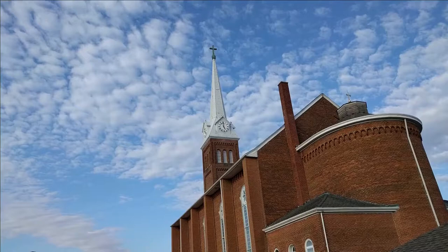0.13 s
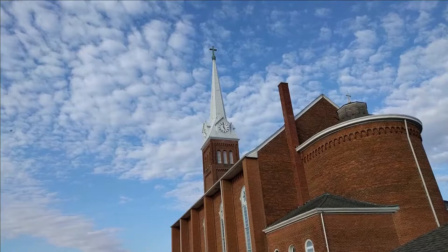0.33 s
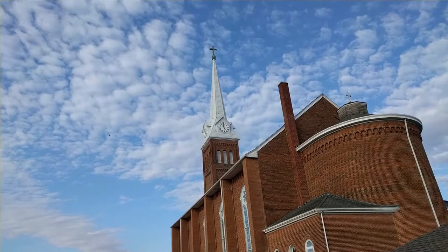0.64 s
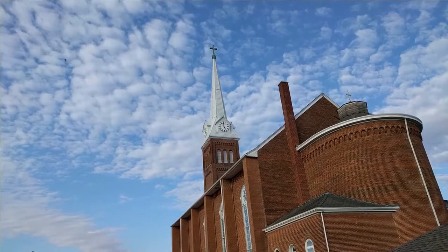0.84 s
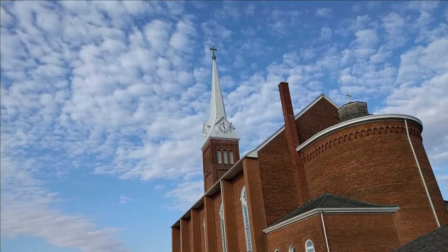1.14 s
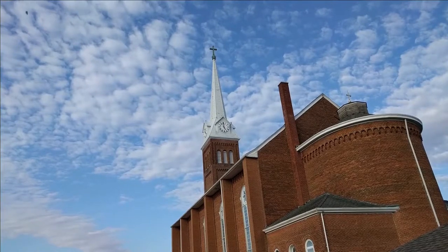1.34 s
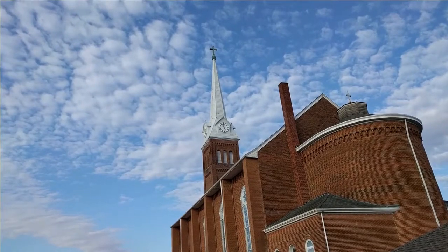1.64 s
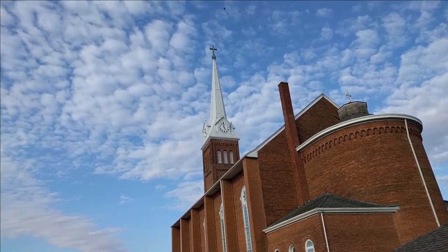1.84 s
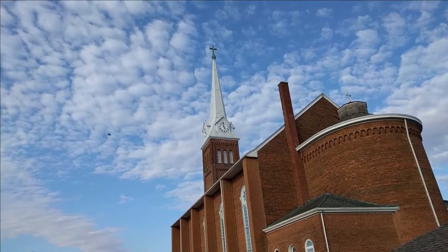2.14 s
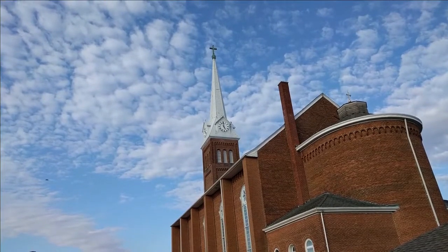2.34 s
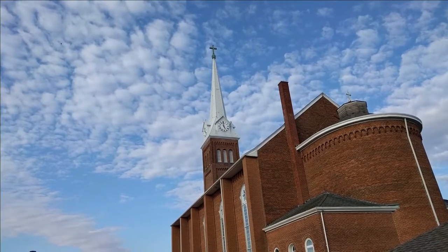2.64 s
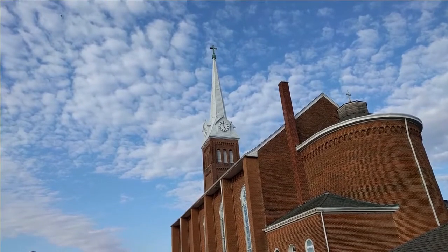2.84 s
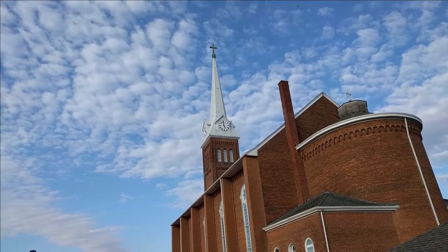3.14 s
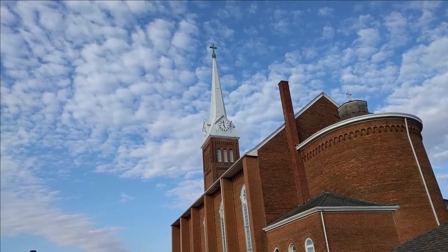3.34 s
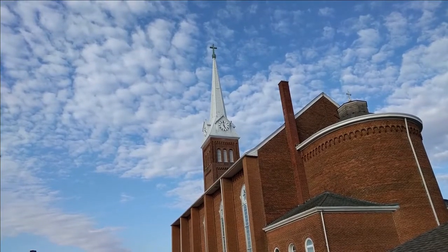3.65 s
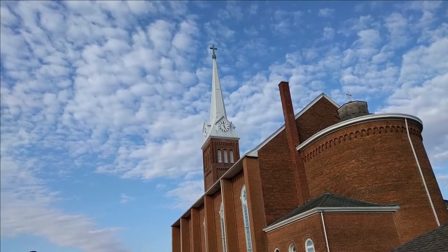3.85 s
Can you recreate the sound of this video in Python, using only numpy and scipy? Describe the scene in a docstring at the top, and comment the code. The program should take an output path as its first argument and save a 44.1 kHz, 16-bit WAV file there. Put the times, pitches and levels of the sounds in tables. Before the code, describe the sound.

One deep metallic church bell stroke, clanging then slowly wavering, still sounding at the end. It follows a quiet outdoor stretch with distant traffic wash, light hiss, small bird notes and a few dry ticks close by.

```python
"""After a moment of silence, a low town rumble opens with a distant wash, hiss and a thin whine: coloured noises
and one wavering tone. Over it a small bird gives gliding sine chips and a falling whistle, echoed by buildings,
amid three tiny ticks near the microphone, each a few fast-dying modes.
Then a church bell is struck once in its tower and rings on, heard from the street below: its partials beat
slowly in close pairs over a crowd of weak modes, while the clapper's noisy clang dies away in the belfry."""
import sys
import numpy as np
from scipy import signal
from scipy.fft import rfft, irfft
from scipy.io import wavfile

SR = 44100
rng = np.random.default_rng(int(sys.argv[2]) if len(sys.argv) > 2 else 0)


def digitize_waveform(pressure):
    """Quantize a signal to 16-bit integers and store it at the path in sys.argv[1].

    Rows of a 2-D input are taken as channels; values are limited to [-1, 1].
    """
    field = np.atleast_2d(pressure).T
    bounded = np.clip(field, -1, 1)
    quanta = np.round(bounded * 32767).astype(np.int16)
    wavfile.write(sys.argv[1], SR, quanta)


N = 176400
T = np.arange(N) / SR  # s
HZ = np.fft.rfftfreq(N, 1 / SR)


def amp(db):
    """Decibels to gain."""
    return 10 ** (np.asarray(db) / 20)


def unit(x):
    """Scales to rms 1."""
    return x / np.sqrt(np.mean(abs(x) ** 2) + 1e-30)


def over_hz(points, hz):
    """Reads a table on a log-frequency axis."""
    f, value = np.transpose(points)
    return np.interp(np.log(hz + 1), np.log(f), value)


def level(points):
    """Gain curve from rows of time and dB."""
    return amp(np.interp(T, *np.transpose(points)))


def noise(spectrum):
    """Steady noise of the given colour, rms 1."""
    white = rfft(rng.standard_normal(N))
    return unit(irfft(white * amp(over_hz(spectrum, HZ)), N))


def drift(t, rate_hz, count=1024):
    """Slow complex random motion: random phases under a spectrum that falls off above rate_hz."""
    f = np.fft.fftfreq(count, N / SR / count)
    phases = np.exp(2j * np.pi * rng.random(count))
    motion = np.fft.ifft(phases * (abs(f) > 1) / (1 + (f / rate_hz) ** 2))
    return np.interp(t, np.arange(count) * N / SR / count, unit(motion))


def glide(hz):
    """Sine of rms 1 whose phase sums the moving pitch."""
    return np.sqrt(2) * np.sin(2 * np.pi * np.cumsum(hz) / SR)


def add(mix, s, sound):
    """Mixes a sound in at time s."""
    part = mix[round(s * SR):][:len(sound)]
    part += sound[:len(part)]


def echo(x, t60):
    """Diffuse reflections from the buildings: a decaying noise tail of unit energy."""
    tail = rng.standard_normal(SR) * amp(-60 * T[:SR] / t60)
    return signal.fftconvolve(x, tail / np.linalg.norm(tail))[:N]


def rumble():
    """Low town rumble: bass-heavy noise with a slowly moving level."""
    # colour: f/Hz, relative density/dB
    colour = [(15, -40), (34, -24), (49, 1.5), (62, 0.5), (80, -5.5), (105, -6.5), (150, -16.5), (200, -16),
              (280, -25.5), (600, -47.5)]
    # fader: t/s, level/dB
    fader = [(.15, -55), (.5, -56.5), (.9, -54), (1.6, -54.5), (2.3, -54), (2.7, -51), (3.2, -53.5),
             (4, -54.5)]
    return noise(colour) * level(fader)


def wash():
    """Distant wash of air and traffic: noise fullest in the low mids."""
    # colour: f/Hz, relative density/dB
    colour = [(60, -17), (250, -0.5), (550, -0.5), (800, -3.5), (1150, -4.5), (1600, -9), (2500, -13),
              (4000, -17), (8000, -41)]
    # fader: t/s, level/dB
    fader = [(.15, -68.5), (1.2, -67.5), (2.3, -68), (2.7, -63.5), (4, -64)]
    return noise(colour) * level(fader)


def hiss():
    """Microphone hiss: treble noise with a moving level."""
    # colour: f/Hz, relative density/dB
    colour = [(500, -7), (3000, -6), (5500, -3.5), (6500, -3), (7300, 2.5), (8300, -4), (9200, -6.5),
              (10000, -4.5), (11500, -8), (13500, -5.5), (15800, -8.5)]
    # fader: t/s, level/dB
    fader = [(.15, -73), (.8, -71.5), (2.35, -71), (2.55, -66.5), (4, -68)]
    return noise(colour) * level(fader)


def whine(hz=7500, db=-82.5):
    """Thin high tone whose strength and phase wander at random."""
    return amp(db) * (drift(T, rate_hz=14) * np.exp(2j * np.pi * hz * T)).real


def background():
    """The continuous bed under the events."""
    return whine() + rumble() + wash() + hiss()


def ticks(size=400, top_hz=11100):
    """Tiny dry clicks close to the microphone: small modes that die within milliseconds."""
    # the clicks: t/s, level/dB
    tick_times = [(.6356, -45), (.6639, -44.5), (.958, -35.5)]
    # modes they ring with: f/Hz, relative level/dB, t60/s
    tick_modes = [(1730, -12, 0.0039), (4300, -7.5, 0.0019), (7060, -2.5, 0.0019), (9200, 1, 0.0011)]
    t, out = T[:size], np.zeros(N)
    click = sum(amp(db - 60 * t / t60) * np.sin(2 * np.pi * hz * t) for hz, db, t60 in tick_modes)
    for s, db in tick_times:
        add(out, s, amp(db) * click)
    return signal.sosfilt(signal.butter(2, top_hz, fs=SR, output="sos"), out)


def whistle():
    """The bird's falling whistle: one gliding sine and its echo."""
    # the call: t/s, f/Hz, level/dB
    contour = [(.89, 4660, -78), (.905, 4500, -61), (.93, 4444, -54.5), (.95, 4340, -56.5),
               (.975, 4350, -54.5), (1.0, 4270, -57), (1.035, 4250, -60.5), (1.07, 4165, -63.5),
               (1.11, 4250, -96)]
    echo_db, echo_t60 = -13.5, 0.64  # dB, s
    s, hz, db = np.transpose(contour)
    sounding = (T > s[0]) * (T < s[-1])
    song = amp(np.interp(T, s, db)) * sounding * glide(np.interp(T, s, hz))
    return song + amp(echo_db) * echo(song, echo_t60)


def chips():
    """The bird's faint notes and short chips: sine glides under half-sine swells."""
    # the notes: t/s, length/s, start f/Hz, end f/Hz, level before the common trim/dB
    notes = [(.332, .014, 6700, 7300, -68), (.64, 0.15, 4130, 4330, -84), (1.213, .02, 4000, 4500, -72),
             (1.319, 0.025, 4080, 4600, -70.5), (1.345, .018, 4150, 4500, -72),
             (1.371, 0.057, 2730, 2720, -78), (1.426, 0.02, 4030, 4600, -68.5),
             (1.454, .016, 4200, 4500, -76), (1.643, 0.034, 4020, 4240, -73), (1.76, .02, 3950, 4300, -73),
             (1.783, 0.014, 4700, 5500, -71), (2.18, .012, 5960, 6760, -74)]
    trim_db, echo_db, echo_t60 = 0.5, -2.5, 0.32  # dB, dB, s; strong echo, as they come from farther off
    out = np.zeros(N)
    for start, length, from_hz, to_hz, db in notes:
        u = np.linspace(0, 1, round(length * SR))
        swell = amp(db) * np.sin(np.pi * u)
        add(out, start, swell * glide(from_hz + (to_hz - from_hz) * u))
    return amp(trim_db) * (out + amp(echo_db) * echo(out, echo_t60))


def clang(t, db=-48):
    """Clang of the clapper in the belfry: dense noise, dying at its own speed in each band."""
    # bands: f/Hz, relative density/dB, t60/s
    bands = np.array([(100, -27, 1.2), (250, -2, 0.92), (600, -1, 0.63), (1090, 4, 0.44), (1800, -3, 0.62),
                      (2700, -6, 0.65), (4030, -1, 0.34), (4860, -20, .9), (7200, -12.5, 0.86),
                      (10000, -37, 1.1), (15000, -40, 2)])
    colour, decay = bands[:, :2], bands[:, ::2]
    hz, s, grid = signal.stft(noise(colour), SR, nperseg=512)
    grid = grid * amp(-60 * s / over_hz(decay, hz)[:, None])
    return amp(db) * signal.istft(grid, SR, nperseg=512)[1][:len(t)]


def shimmer(t, count=70):
    """Many weak modes at random pitches make the ring dense and metallic."""
    low_hz, top_hz, db, mean_t60 = 1410, 4245, -59.5, 1.35  # Hz, Hz, dB, s
    modes = np.zeros(len(t))
    for slot, (offset, life, turn) in enumerate(rng.random((count, 3))):
        hz = low_hz + (top_hz - low_hz) * (slot + offset) / count  # one mode in each slot
        fade = amp(-60 * t / (mean_t60 * (.5 + life)))
        modes += fade * np.sin(2 * np.pi * (hz * t + turn))
    return amp(db) * modes / np.sqrt(count / 2)


def partials(t):
    """The bell's decaying modes: close pairs beat; the belfry's reverberation makes them waver at random."""
    # main pairs: f/Hz, level before trim/dB, t60/s, beat rate/Hz, share of the twin, blow to a dip of the beat/s
    pairs = [ (215.1, -47.5, 30, .3, .3, .25), (409.1, -49.5, 35, .72, .18, .4),
             (486.8, -42.7, 18.5, .64, .1, 1.37), (789.0, -45.2, 5.7, .9, .68, .93),
             (1163.5, -55, 7.6, .66, .65, 1.0), (1592.1, -48.5, 8.8, .33, .95, 1.38),
             (2062.6, -48.2, 2.85, 1.22, .66, .97), (2562.6, -55.3, 3.2, .93, .84, .32), ]
    # lesser single modes: f/Hz, level before trim/dB, t60/s
    overtones = [ (647.8, -58, 3.6), (1001.6, -49.5, 1.6), (1095.3, -58, 1.2), (1110.5, -63.5, 6.8),
                 (1395.7, -67, 4.2), (1505.6, -61, 2.6), (1800.7, -57, 2.8), (1869.2, -67, 3.6),
                 (1898.5, -56.5, 1.3), (2017.7, -62, 2.2), (2263.7, -62, 1.0), (2407.1, -59, 2.1),
                 (2437.1, -53, 1.6), (2532, -67, 2.0), (2700.3, -58, .8), (2779.1, -61, 1.9),
                 (2859.3, -64, 1.1), (2928.7, -66, 2.3), (3073.1, -64, 1.7), (3086.3, -50, 1.8),
                 (3104.7, -62, 1.3), (3135.7, -62, 2.1), (3545.6, -69, 2.4), (3562.7, -59, 1.2),
                 (3616.7, -61, 3.0), (3653.7, -65, 1.7), (3769.2, -67, 2.0), (4157.8, -58, 1.35),
                 (4236.6, -67, .7), (4492.9, -70, 1.7), (4695.1, -72, 1.7), (5119.4, -67, .8),
                 (5230.8, -73, 1.0), (6203.7, -74, .8), (7101.1, -74, 1.4), ]
    trim_db = -0.12
    # reverberant waver: depth at 1 kHz, rate in Hz, growth with pitch
    waver, waver_hz, waver_slope = 0.11, 11.4, 0.69
    scatter, scatter_s = 0.26, 0.094  # early reflections: first extra depth at 1 kHz, time constant in s
    depth = waver + scatter * np.exp(-t / scatter_s)
    ring = np.zeros(len(t))
    for hz, db, t60, beat, twin, dip in [*pairs, *[(*row, 0, 0, 0) for row in overtones]]:
        carrier = np.exp(2j * np.pi * (hz * t + rng.random()))
        beating = 1 - twin * np.exp(2j * np.pi * beat * (t - dip))
        wavering = 1 + depth * (hz / 1000) ** waver_slope * drift(t, waver_hz)
        ring += amp(trim_db + db - 60 * t / t60) * (carrier * beating * wavering).real
    return ring


def bell(strike_s=2.431):
    """One blow starts all modes; reflections from the walls fill the sound in after the direct arrival."""
    attack_s, direct, echo_s, echo_rise_s = .0035, .45, .018, .009  # s, share of the gain, s, s
    t, out = T[:N - round(strike_s * SR)], np.zeros(N)
    ring = clang(t) + shimmer(t) + partials(t)
    first = direct * (1 - np.exp(-t / attack_s))
    walls = (1 - direct) * (1 - np.exp(-np.maximum(t - echo_s, 0) / echo_rise_s))
    add(out, strike_s, ring * (first + walls))
    return out


def scene():
    """Everything at one microphone."""
    return (background() + ticks() + whistle() + chips() + bell())[None]


def record(dry):
    """The sound opens after a moment of silence; a steep low-pass limits the band."""
    start_s, edge_hz = .12, 15950
    lowpass = signal.firwin(511, edge_hz, window=("kaiser", 9), fs=SR)
    return signal.oaconvolve(dry * (T > start_s), lowpass[None], "same")


dry = scene()
out = record(dry)
digitize_waveform(out)
```